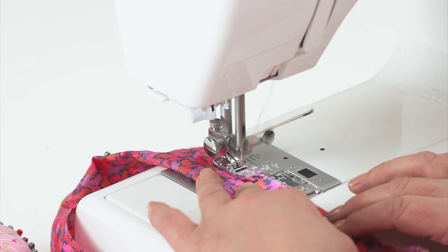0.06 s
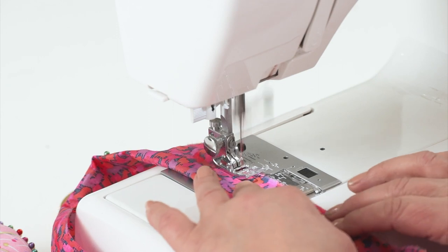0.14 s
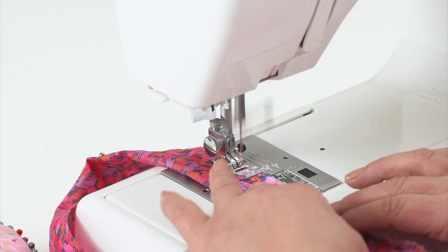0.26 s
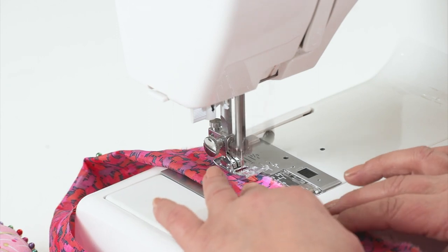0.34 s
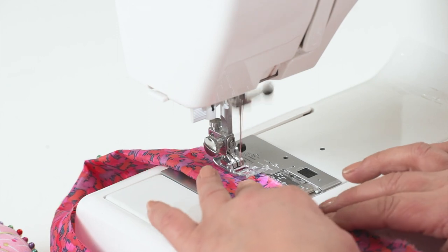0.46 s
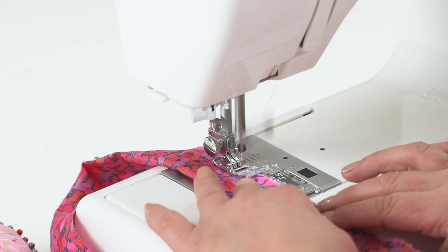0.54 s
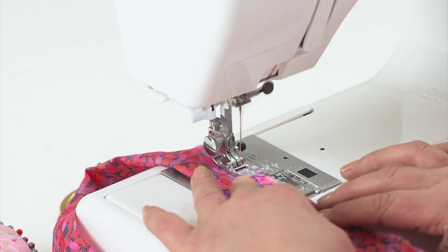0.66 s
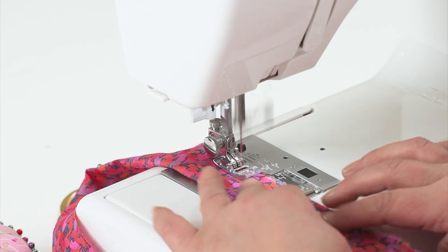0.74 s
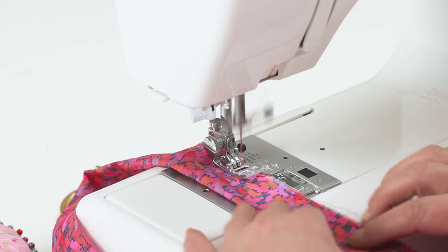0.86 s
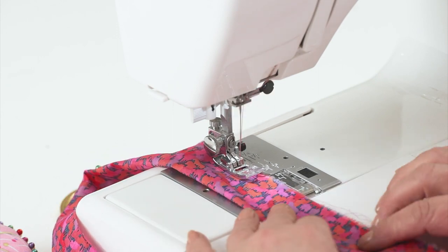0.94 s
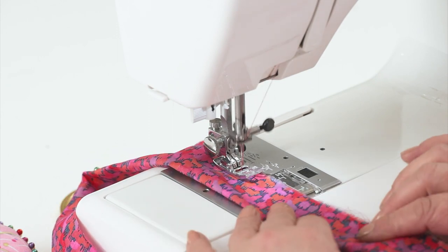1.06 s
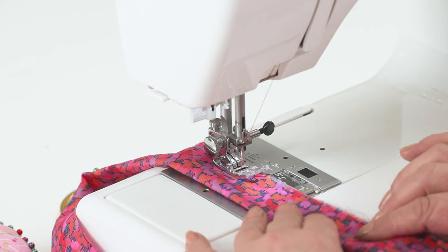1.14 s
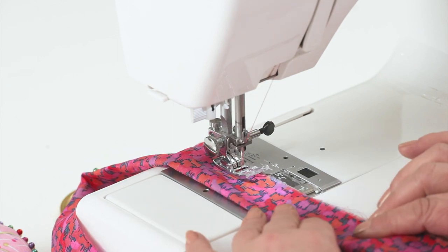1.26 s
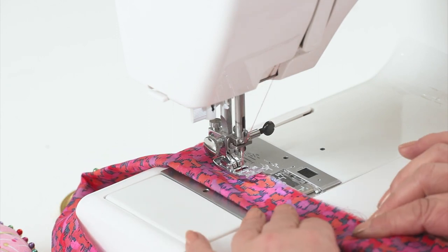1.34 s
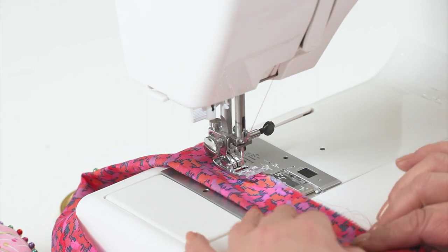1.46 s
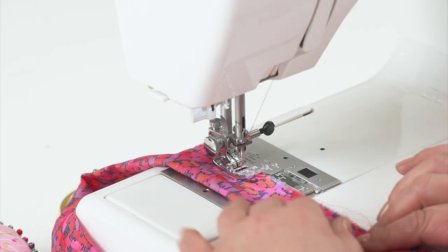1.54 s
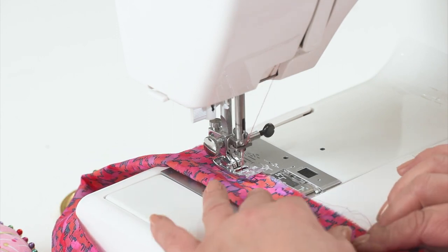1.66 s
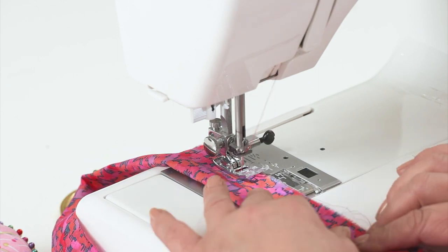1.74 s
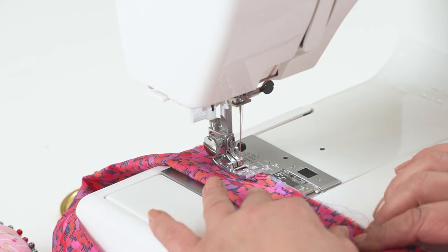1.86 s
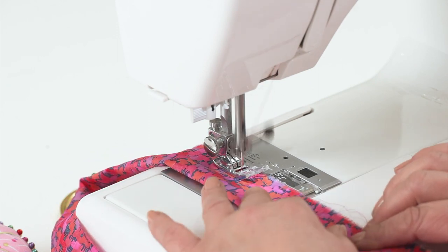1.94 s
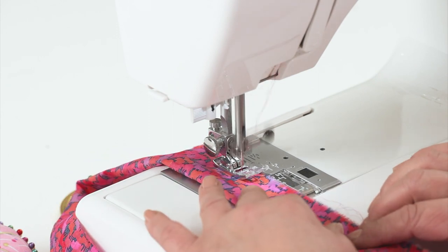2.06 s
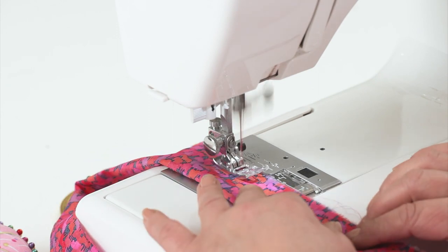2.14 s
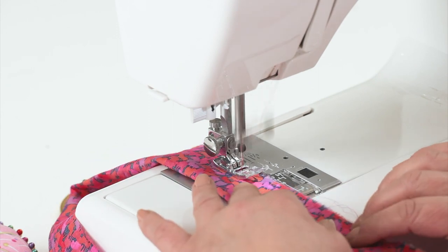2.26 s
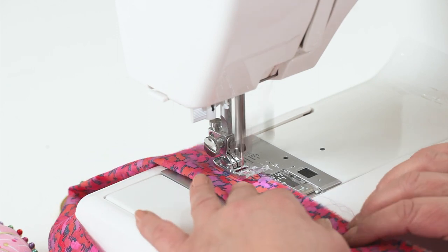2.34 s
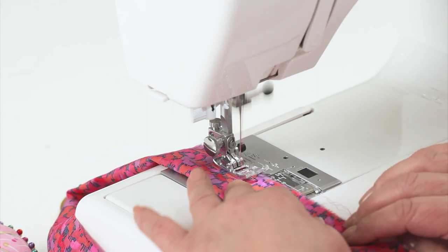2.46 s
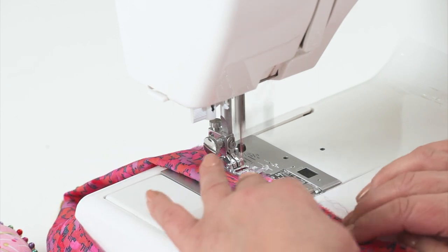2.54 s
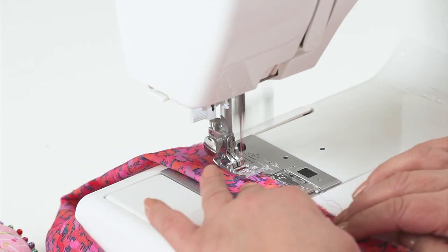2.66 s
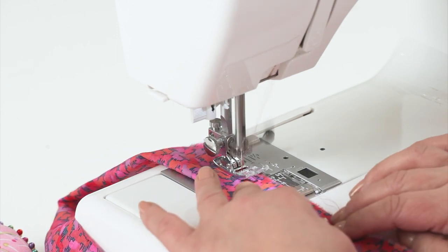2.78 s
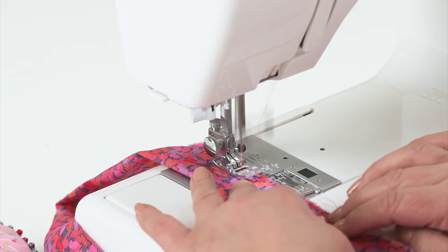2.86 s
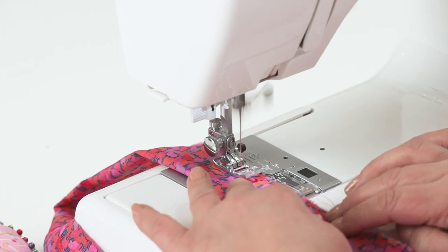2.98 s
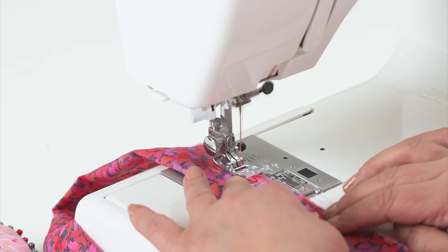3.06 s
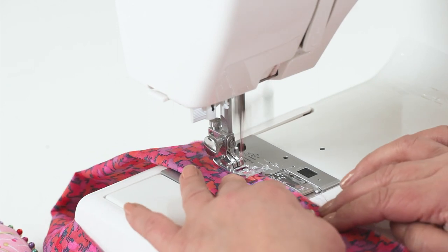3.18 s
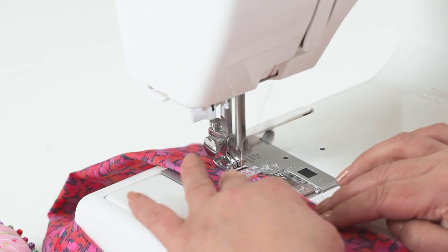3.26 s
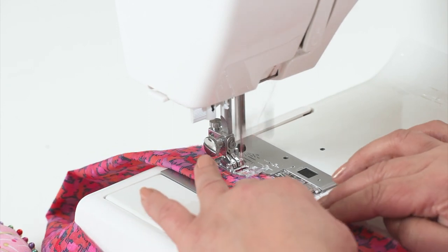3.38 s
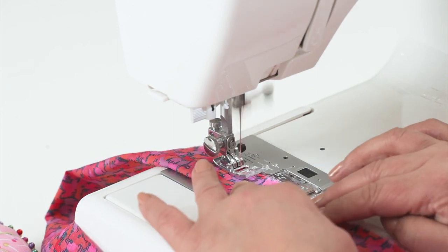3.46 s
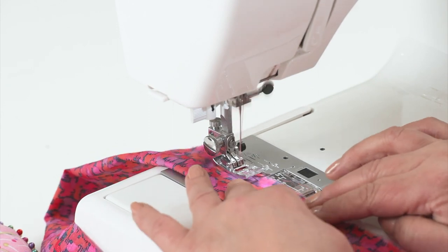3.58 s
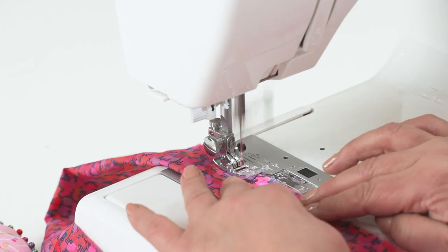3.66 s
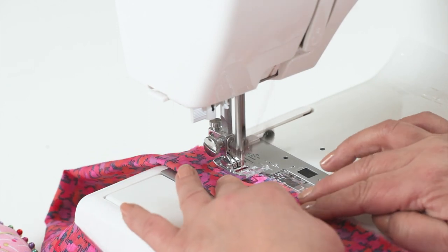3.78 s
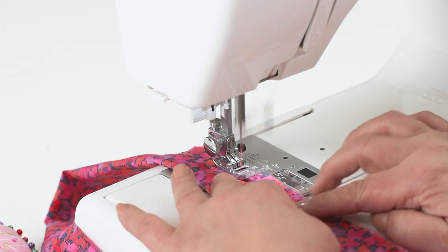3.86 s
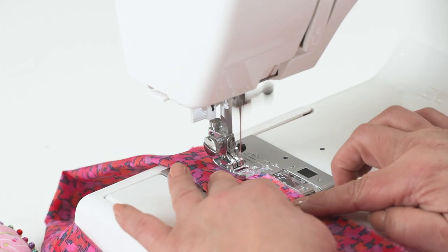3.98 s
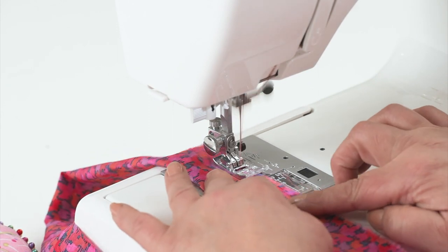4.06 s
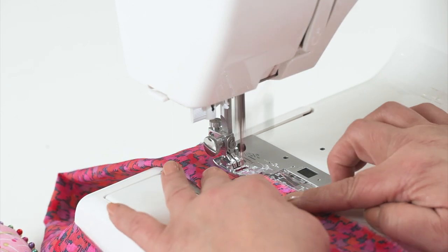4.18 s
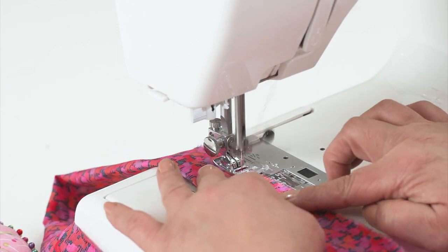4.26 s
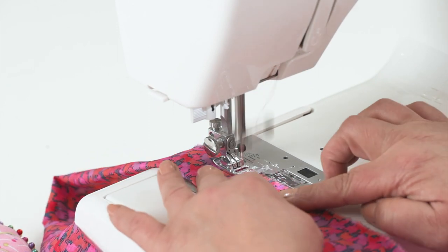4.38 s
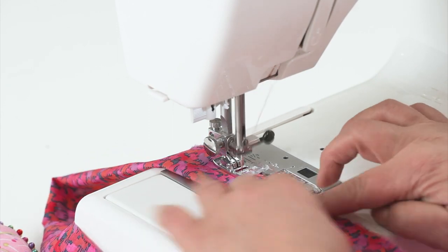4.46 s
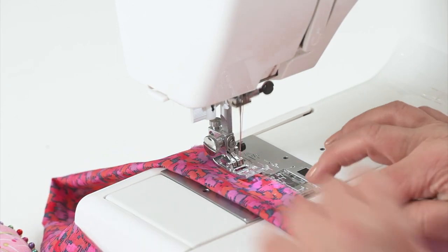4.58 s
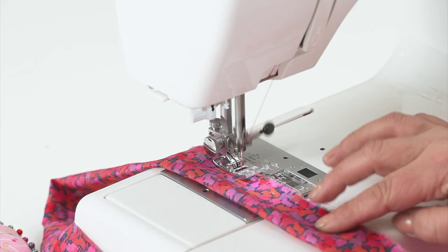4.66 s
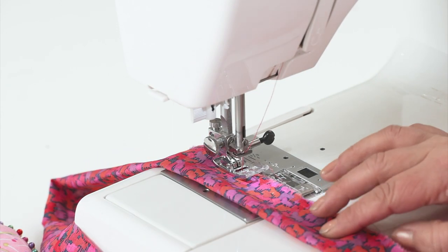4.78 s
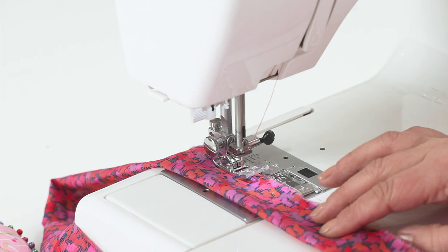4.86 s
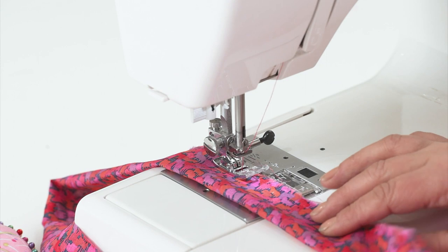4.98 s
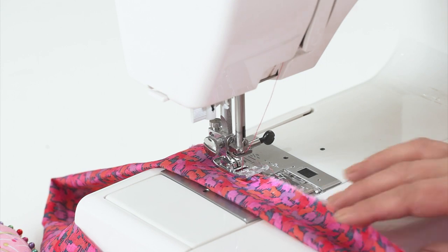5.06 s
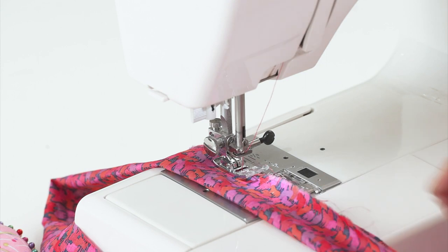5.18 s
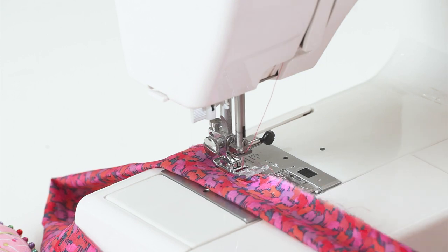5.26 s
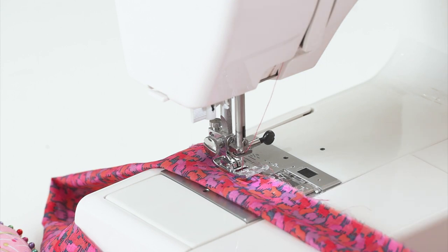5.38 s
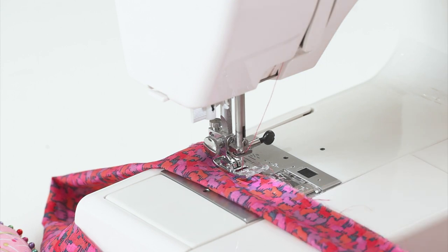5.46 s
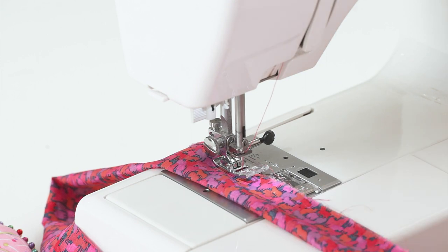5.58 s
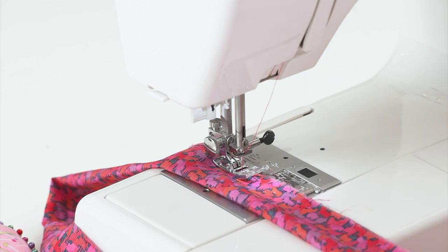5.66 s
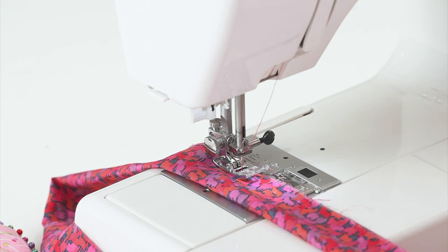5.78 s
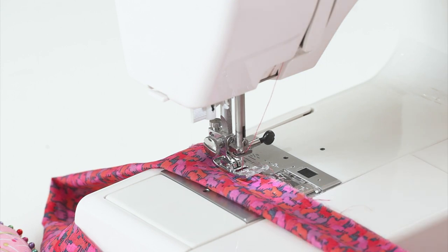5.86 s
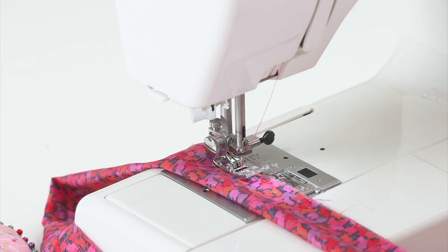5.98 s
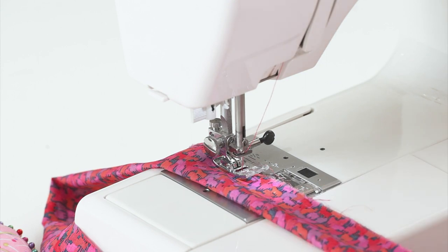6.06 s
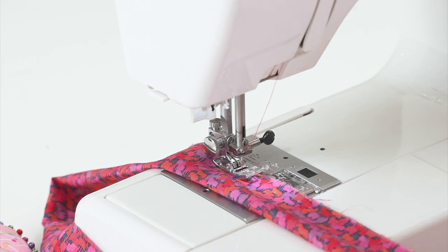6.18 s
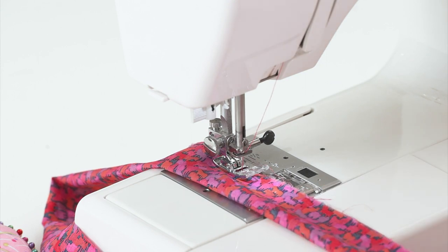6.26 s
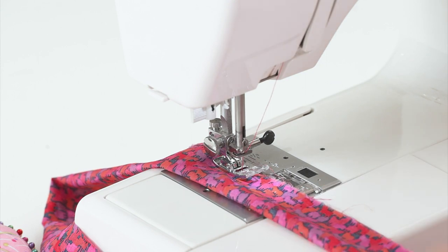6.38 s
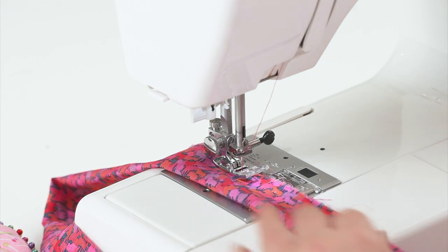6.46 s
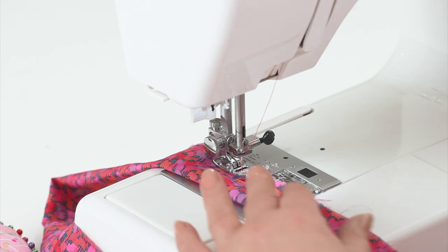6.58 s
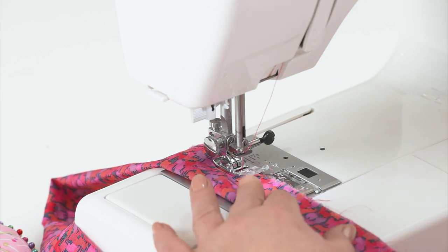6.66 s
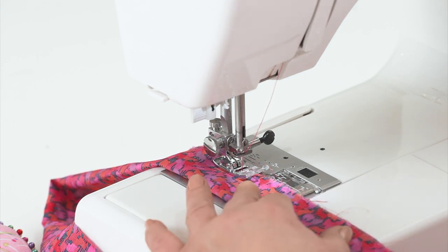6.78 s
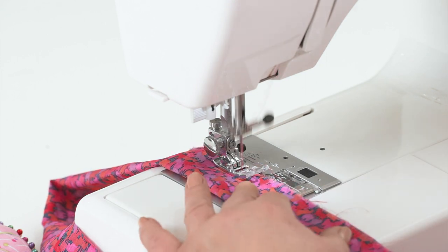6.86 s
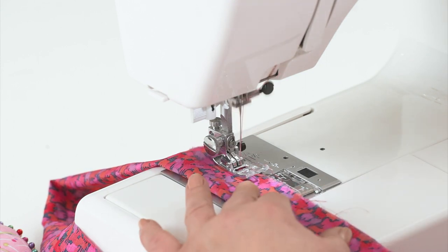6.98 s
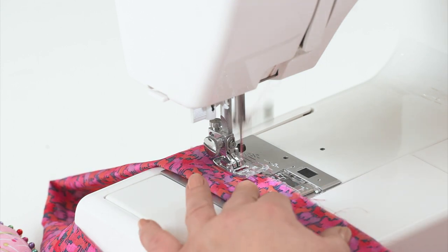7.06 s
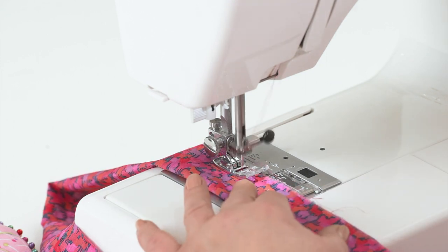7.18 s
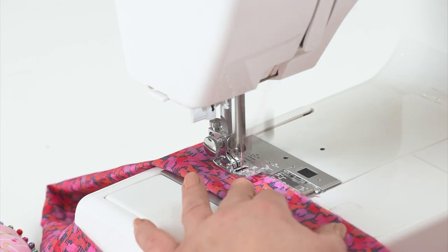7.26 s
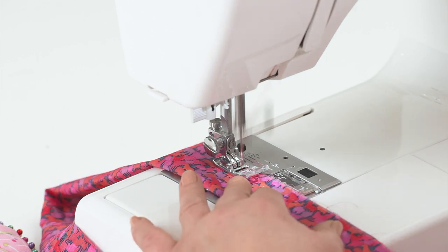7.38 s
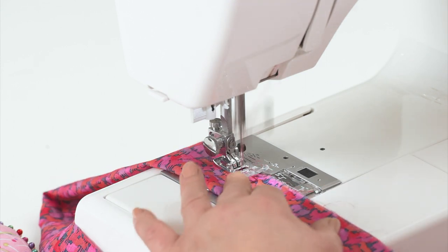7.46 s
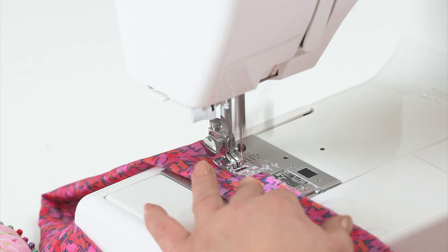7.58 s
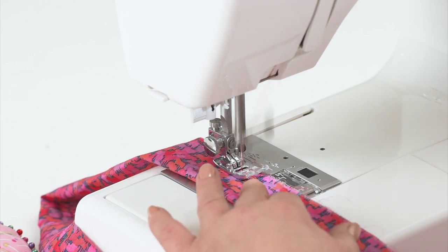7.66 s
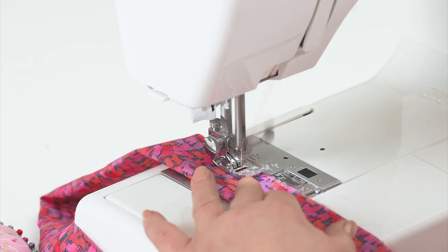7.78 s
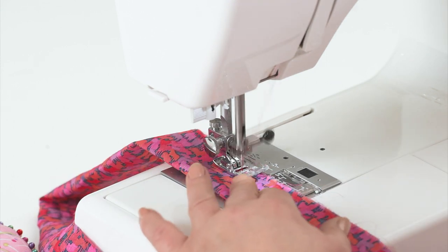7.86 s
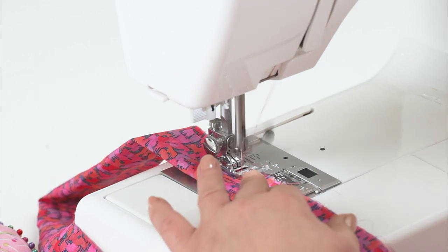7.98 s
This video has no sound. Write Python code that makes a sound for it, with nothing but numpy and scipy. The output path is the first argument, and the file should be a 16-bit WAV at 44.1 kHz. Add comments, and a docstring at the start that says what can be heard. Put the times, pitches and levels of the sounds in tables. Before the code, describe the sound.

An electric sewing machine clatters through three runs of fast stitching, slowing to stops between them, with faint cloth rustle and small taps in the pauses.

```python
"""An electric sewing machine stitches three runs of a seam on a table in a quiet room.
Once a turn a grainy hook scrape rings metal modes, and thumps and lesser blows knock the housing.
The motor adds sine hum, gear noise, commutator whine and table shake; the belt groans at some starts.
In the pauses grainy noise makes shifting cloth, and short blows ring the table top as taps."""
import sys
import numpy as np
from scipy import signal
from scipy.fft import rfft, irfft
from scipy.io import wavfile
from scipy.ndimage import uniform_filter1d

SR = 44100
rng = np.random.default_rng(int(sys.argv[2]) if len(sys.argv) > 2 else 0)


def to_linear_factor(level_db):
    """Convert decibel levels (scalar or array-like) to linear amplitude factors."""
    exponent = np.asarray(level_db, float) / 20
    return 10 ** exponent


def materialize(psi):
    """Save the field psi as 16-bit PCM at rate SR to the path in sys.argv[1].

    A 1-D psi becomes a single channel; in a 2-D psi each row is a channel.
    """
    bounded = np.clip(np.atleast_2d(psi).T, -1, 1)
    quanta = np.round(bounded * 32767).astype(np.int16)
    wavfile.write(sys.argv[1], SR, quanta)


N = 354123
TIME = np.arange(N) / SR   # s
FULL_SPEED = 12   # stitches per s
HUM_HZ = 99.7


def rms_one(x):
    """Scale to rms 1."""
    return x / np.sqrt(np.mean(x ** 2) + 1e-20)


def in_time(tables):
    """Columns of dB over time, at -120 dB outside the tables."""
    out = -120.
    for rows in tables:
        s, *columns = np.transpose(rows)
        levels = [np.interp(TIME, s, column, left=-120, right=-120) for column in columns]
        out = np.maximum(out, levels)
    return out


def drift(rate):
    """Slow random wander of rms 1, with this many new values per second."""
    steps = rng.standard_normal(int(N / SR * rate) + 2)
    return rms_one(np.interp(TIME * rate, np.arange(len(steps)), steps))


def cut(x, hz, kind):
    """Butterworth filter of order 2 in its design."""
    sos = signal.butter(2, np.clip(hz, 10, .45 * SR), kind, fs=SR, output="sos")
    return signal.sosfilt(sos, x + 1e-18)


def coloured(spectrum):
    """Noise of rms 1 with the given spectrum."""
    hz, db = np.transpose(spectrum)
    bins_hz = np.maximum(np.arange(N // 2 + 1) * SR / N, 1)
    gain = to_linear_factor(np.interp(np.log(bins_hz), np.log(hz), db))
    return rms_one(irfft(rfft(rng.standard_normal(N)) * gain, N))


def resonate(x, modes, widen=0.73):
    """Parallel resonances with alternating signs; widen scales every width, so wider rings shorter."""
    out = 0
    for k, (hz, width, db) in enumerate(modes):
        r = np.exp(-np.pi * width * widen / SR)
        poles = [1, -2 * r * np.cos(2 * np.pi * hz / SR), r * r]
        zeros = [(1 - r * r) / 2, 0, (r * r - 1) / 2]
        out = out + (-1) ** k * to_linear_factor(db) * signal.lfilter(zeros, poles, x + 1e-18)
    return out


def clicks(seconds, sizes):
    """A train of single-sample clicks."""
    at, out = np.round(seconds * SR).astype(int), np.zeros(N)
    inside = (at >= 0) & (at < N)
    np.add.at(out, at[inside], sizes[inside])
    return out


def burst(train, hold_s, fade_s, grain_db):
    """Each click opens a short grainy scrape that holds, then fades."""
    t = np.arange(int(.05 * SR)) / SR
    shape = np.exp(-np.maximum(t - hold_s, 0) / fade_s)
    grains = rng.standard_normal(N) * to_linear_factor(grain_db * np.minimum(rng.exponential(1, N), 2))
    return signal.fftconvolve(train, shape)[:N] * rms_one(grains)


def at_speed(speed, base_db, doubling_db):
    """Level in dB: base_db at full speed, plus doubling_db for each doubling of speed."""
    return base_db + doubling_db * np.log2(np.maximum(speed, 1e-3) / FULL_SPEED)


# Shaft speed, one table per run. Each row: time in seconds, speed in stitches per second.
SHAFT_SPEED = [
    [(0, 10.85), (.67, 10.993), (.85, 7.33), (1, 4.89), (1.22, 0)],
    [(1.66, 0), (1.9, 5.348), (2.08, 9.085), (2.25, 10.822), (2.55, 11.778), (3, 11.985), (4.31, 12.106),
     (4.4, 10.091), (4.56, 6.563), (4.98, 0)],
    [(6.75, 0), (6.99, 4.927), (7.2, 8.292), (7.4, 9.668), (7.7, 10.475), (8.03, 10.726)],
]
# How far the shaft turns from the start of each run to its first hook click. One value per run, in turns.
FIRST_CLICK_TURNS = [.6492, .6645, .5997]


def shaft():
    """Speed and angle (turns) over time; start and length of every turn, with one led in before each run."""
    speed, angle, turns = np.zeros(N), np.zeros(N), []
    for rows, first in zip(SHAFT_SPEED, FIRST_CLICK_TURNS):
        s, rate = np.transpose(rows)
        run = np.interp(TIME, s, rate, left=0, right=0)
        done = np.cumsum(run) / SR - first
        speed = speed + run
        angle = np.where(TIME >= s[0], done + np.ceil(angle[-1]) + 1, angle)
        click = np.interp(np.arange(int(done[-1]) + 1), done[run > 0], TIME[run > 0])
        gaps = np.diff(click)
        # the outer turns carry on the change in length of their neighbours
        lead, last = gaps[0] ** 2 / gaps[1], gaps[-1] ** 2 / gaps[-2]
        turns.append([np.r_[click[0] - lead, click], np.r_[lead, gaps, last]])
    return speed, angle, *np.concatenate(turns, axis=1)


def click_levels(start, speed):
    """Click and clack dB of every turn: both sink with speed, and chance makes some clacks land badly."""
    now, luck = np.interp(start, TIME, speed, left=0), rng.random((len(start), 2))
    # below 5.3 stitches per s, a further 23 dB is lost per halving
    fade_db = 23 * np.minimum(np.log2(np.maximum(now, 1e-3) / 5.3), 0)
    spread_db = np.sqrt(12) * (luck[:, 0] - .5)   # uniform, standard deviation 1 dB
    miss_db = 6 * np.log(1 - luck[:, 1])   # mean loss 6 dB
    click_db = at_speed(now, base_db=-25, doubling_db=1.7) + fade_db + spread_db
    clack_db = at_speed(now, base_db=-25, doubling_db=10) + fade_db + miss_db
    return click_db, clack_db


# Metal modes of the hook. Each row: pitch in Hz, width in Hz before widening, relative level in dB.
HOOK_MODES = [(5080, 32, 1.5), (6020, 250, -3), (6816, 81, 6), (7004, 68, 10.5), (7176, 127, 7.5),
              (8180, 170, 7.5), (8390, 303, 2.5), (12900, 530, -13.5), (13100, 59, -19)]
# Duller modes of the clack. Each row: pitch in Hz, width in Hz before widening, relative level in dB.
CLACK_MODES = [(1262, 47, 7.5), (1815, 44, 6), (2550, 41, -8.5)]
# Lighter metal ticks after the click. Each row: delay as a share of a turn, drive against the click
# in dB, pitch in Hz, width in Hz before scaling.
TICKS = [(0.46, -15.5, 11300, 6500), (0.15, -28, 13000, 6500), (.565, 8, 2830, 300), (0.5, 18, 2330, 69),
         (0.52, 11, 1600, 1900)]


def hook(start, length, click_db, clack_db):
    """The hook scrapes past the bobbin case, a duller clack follows, then lighter ticks."""
    scrape = burst(clicks(start, to_linear_factor(click_db)), 0.0023, 0.0037, 5)
    clack = burst(clicks(start + .05 * length, to_linear_factor(clack_db)), 0.0018, 0.004, 9.6)
    out = to_linear_factor(1) * resonate(scrape, HOOK_MODES, widen=4.8)
    out += to_linear_factor(12.5) * resonate(clack, CLACK_MODES, widen=1.28)
    for share, db, hz, width in TICKS:
        luck = rng.uniform(-2.0, 1, (len(start), 2))
        # slow turns tick softly
        force = to_linear_factor(click_db + db + 1.2 * luck[:, 1]) * (length.min() / length) ** 2
        train = clicks(start + (share + 0.01 * luck[:, 0]) * length, force)
        tick = burst(train, 0.0023, 0.0014, 1.6)
        for _ in range(2):   # the same resonance twice, for steeper skirts
            tick = resonate(tick, [(hz, width, 0)])
        out += tick
    return out


# Lesser blows of feed and take-up lever. Each row: delay as a share of a turn, relative force in dB,
# direction as a sign, hardness as a lowpass in Hz.
BLOWS = [(0.03, 2.5, -1, 500), (.155, 2, -1, 500), (0.247, 3, -1, 600), (0.299, 7, 1, 500),
         (.435, 2.5, -1, 600), (.52, 3.5, 1, 500), (0.578, -2.5, 1, 500), (0.658, -4.5, 1, 500),
         (0.779, -7, 1, 500), (0.872, 1, 1, 500)]
# Modes of the housing. Each row: pitch in Hz, width in Hz before scaling, relative level in dB.
HOUSING_MODES = [(130, 23, -5), (215.8, 17.1, -5), (281.5, 13, -4.5), (308.6, 32, -6), (374.4, 34.6, 0),
                 (423, 79, -7.5), (547, 28.6, -5), (608.3, 23.4, -3), (684, 265, -9.5), (918, 200, -12.5),
                 (1290, 70, -29.5), (1846, 85, -13), (2380, 5.8, -40), (2670, 360, -23), (4000, 250, -24),
                 (4370, 33, -18.5), (5340, 46, -54)]
# Modes of the main thump. Each row: pitch in Hz, width in Hz before scaling, relative level in dB.
THUMP_MODES = [(130, 110, 2), (240, 170, 0), (380, 200, -3), (600, 250, -9)]


def linkage(start, length, level_db):
    """Needle-bar thump and lesser blows ring the housing; slack parts chatter on motor torque pulses."""
    blows = 0
    for share, db, direction, hardness_hz in BLOWS:
        luck = rng.standard_normal((len(start), 2))
        force = np.sign(direction) * to_linear_factor(db + 2 * luck[:, 1])
        train = clicks(start + (share + 0.0045 * luck[:, 0]) * length, force)
        blows = blows + cut(train, hardness_hz, "low") * SR / hardness_hz
    torque = 1 + np.cos(2 * np.pi * HUM_HZ * TIME)
    slack = (rng.random(N) < 600 * torque / SR) * rng.standard_normal(N)
    knocks = rms_one(blows) + to_linear_factor(-6) * rms_one(cut(slack, 495, "low"))
    # the needle bar turns round: firmest for turns of 0.095 to 0.11 s
    firm = np.minimum(.11 / length, 1) ** 2 * np.minimum(length / .095, 1) ** 2
    firm = firm * to_linear_factor(rng.normal(0, 1, len(start)))
    push = cut(clicks(start + .364 * length, -firm), 700, "low")
    thump = to_linear_factor(52) * resonate(push, THUMP_MODES)
    return to_linear_factor(level_db - 3.5) * (rms_one(resonate(knocks, HOUSING_MODES, widen=1.0)) + thump)


# Hum partials. Each row: multiple of the hum pitch, relative level in dB.
HUM_PARTIALS = [(1, 1), (2, -12.5), (3, -21.5), (4, -18), (6, -43)]
# Course of the hum, strong at starts and in places while slowing, mostly weaker at full speed.
# One table per run, each row: time in seconds, relative level in dB.
HUM_LEVEL = [
    [(0, -31), (.7, -53), (.93, -29), (1.14, -47), (1.23, -50.5), (1.35, -63)],
    [(1.6, -71), (1.67, -36.5), (1.78, -27.5), (1.85, -30.5), (2.03, -31.5), (2.3, -29.5), (2.7, -43),
     (4.3, -36), (4.52, -33), (4.79, -44), (4.95, -82)],
    [(6.68, -63), (6.75, -44), (6.89, -38), (6.96, -32), (7.11, -24.5), (7.23, -38.5), (8.03, -31)],
]


def motor_hum(angle, speed_share):
    """Mains hum as a stack of sines, wavering by chance and swelling once a turn."""
    hum = sum(to_linear_factor(db) * np.sin(2 * np.pi * k * HUM_HZ * TIME + k) for k, db in HUM_PARTIALS)
    swell_db = 0.76 * np.cos(2 * np.pi * (angle - .4)) * speed_share
    return to_linear_factor(in_time(HUM_LEVEL)[0] + 4 + swell_db + 1.5 * drift(18)) * hum


# Spectrum of the gear whir before its highpass. Each row: frequency in Hz, relative density in dB per Hz.
WHIR_SPECTRUM = [(35, -36), (60, 1.5), (118, 1.5), (300, 1), (362, -7), (468, -31.5), (551, -3),
                 (1060, -13), (1900, -20), (4830, -28), (7180, -32), (15900, -55)]


def gear_whir(angle, gear_db):
    """Meshing gears: noise plus random tooth hits ringing the housing, pulsing with the load each turn."""
    load_db = 0.66 * np.cos(2 * np.pi * (angle - .25))
    teeth = (rng.random(N) < 2500 / SR) * rng.standard_normal(N)
    rattle = rms_one(cut(resonate(teeth, HOUSING_MODES), 1090, "high"))
    hiss = cut(coloured(WHIR_SPECTRUM), 910, "high")
    return to_linear_factor(gear_db + load_db + 1.2 * drift(30)) * (to_linear_factor(12.5) * hiss + to_linear_factor(-1) * rattle)


# Commutator tones. Each row: cycles per turn, level in dB against the gears before the shell rings.
WHINE_TONES = [(331.0, -21), (442.0, -23)]
# Modes of the motor shell. Each row: pitch in Hz, width in Hz before scaling, gain in dB per pass.
SHELL_MODES = [(2980, 420, 8), (4000, 900, -3), (5050, 500, 5.5)]


def commutator_whine(speed, gear_db):
    """Tones locked to the smoothed shaft angle, passed twice through each mode of the motor shell."""
    smooth = uniform_filter1d(np.cumsum(speed) / SR, size=SR // 8)
    whine = 0
    for k, db in WHINE_TONES:
        level = to_linear_factor(gear_db + db + 2 * drift(8))
        whine = whine + level * np.sin(2 * np.pi * k * smooth + .5 * drift(60))
    return sum(resonate(resonate(whine, [mode]), [mode]) for mode in SHELL_MODES)


# Table shaken by the shaft. Each row: multiple of the stitch rate, relative level in dB.
SHAKE_PARTIALS = [(2, -60), (3, -77), (4, -50.5), (5, -58), (6, -46), (7, -50)]


def table_shake(angle, speed_share, linkage_db):
    """The turning shaft shakes the table at low multiples of the stitch rate, more at speed."""
    shake = sum(to_linear_factor(db) * np.cos(2 * np.pi * k * (angle - .2)) for k, db in SHAKE_PARTIALS)
    return to_linear_factor(linkage_db + 30.5) * speed_share * shake


# Lowest modes of the table. Each row: pitch in Hz, width in Hz before scaling, gain in dB.
JOLT_MODES = [(101, 7, 36), (139, 14, 33), (216, 10, 32)]


def jolt(start, length):
    """Once a turn the needle bar's weight jolts the table's lowest modes, harder at speed."""
    force = to_linear_factor(rng.normal(0, 1.95, len(start))) * (FULL_SPEED * length) ** -2.1
    push = cut(clicks(start + .2 * length, force), 280, "low")
    return sum(resonate(push, [mode]) for mode in JOLT_MODES)


# The loaded belt at the second and third start. Each row: time of the peak in seconds, level in dB.
GROANS = [(1.83, -30.5), (6.959, -30.5)]
# Housing modes rung by the belt. Each row: pitch in Hz, width in Hz before scaling, relative level in dB.
GROAN_MODES = [(357.4, 22.5, 7), (600, 65, -9)]


def groan():
    """Before the shaft is up to speed the belt judders on its pulley and rings loud housing modes."""
    rise, fall = 192, 89   # dB per s
    slips = (rng.random(N) < 300 / SR) * rng.standard_normal(N)
    level = sum(to_linear_factor(db - np.maximum(rise * (s - TIME), fall * (TIME - s))) for s, db in GROANS)
    return level * rms_one(resonate(cut(slips, 1350, "low"), GROAN_MODES))


# Taps, clunks, pedal clicks, and at 4.824 s the bright edge of the last slow hook click.
# Each row: time in seconds, relative blow level in dB, body pitch in Hz, relative treble level in dB,
# treble pitch in Hz.
TAPS = [(1.107, -26, 740, -62, 4410), (1.169, -62, 900, -68, 4500), (1.361, -47, 352, -86, 8950),
        (1.633, -43.5, 390, -61, 4670), (1.66, -40.5, 814, -72, 4170), (4.824, -70, 600, -64, 11500),
        (4.954, -52.5, 853, -78, 4160), (4.976, -67, 571, -70, 7480), (5.037, -21, 680, -61, 4660),
        (5.234, -60, 686, -66, 4750), (5.397, -48, 905, -63, 3710), (5.402, -45, 1300, -64, 5990),
        (5.635, -59, 446, -70, 3950), (6.724, -47, 380, -60.5, 4830), (6.747, -42, 453, -85, 4000),
        (6.87, -35, 346, -64, 4240)]
# Modes of the table top. Each row: pitch in Hz, relative level in dB, 60 dB decay in seconds before damping.
TABLE_TOP = [(152, -8, 0.29), (200, 3, 0.67), (336, -0.5, 0.86), (555, -3.5, 0.16), (617, -8, 0.32),
             (640, -13, 0.52), (710, -5, 0.17), (837, -8, 0.26), (1000, -17.5, 0.073), (1300, -8, 0.3),
             (1530, -22, 0.19), (1500, -38, 0.86)]


def taps():
    """A blow and a short rattle ring the table top up to the tap's body pitch, with a bright tick on top."""
    # a decay time becomes a resonance width
    modes = [(hz, np.log(1000) / (np.pi * t60), db) for hz, db, t60 in TABLE_TOP]
    out = 0
    for s, blow_db, body_hz, treble_db, treble_hz in TAPS:
        blow = clicks(np.array([s]), np.ones(1))
        rattle = burst(blow, 0.015, 0.0098, 9.4)
        force = to_linear_factor(blow_db + 15) * cut(22 * blow + rattle, 1.47 * body_hz, "low")
        force = cut(force, 0.47 * body_hz, "high")
        treble_mode = (treble_hz, 0.93 * treble_hz, treble_db + 16)
        tick = resonate(burst(blow, 0.0011, 0.004, 2.1), [treble_mode])
        body = resonate(force, modes, widen=16)   # heavily damped
        out = out + body + to_linear_factor(-23) * cut(force, 200, "high") + tick
    return out


# Cloth under the hand in the pauses, one table per pause. Each row: time in seconds, hiss level in dB,
# drag level in dB.
CLOTH = [
    [(1.2, -85, -71), (1.41, -94, -72), (1.62, -89, -63.5)],
    [(4.85, -70, -76), (4.95, -90, -75), (5.15, -76, -58), (5.37, -72, -74), (5.41, -70, -56.5),
     (5.79, -67.5, -67.5), (6.02, -96, -73), (6.29, -62, -70.5), (6.38, -83, -72), (6.72, -66, -69.5)],
]


def cloth():
    """Fabric slides under the hand: fine grainy hiss and a duller drag on the bed."""
    hiss_db, drag_db = in_time(CLOTH)
    grain_db = 4.9 * np.minimum(rng.exponential(1, (2, N)), 2)
    grains = rng.standard_normal((2, N)) * to_linear_factor(grain_db)
    hiss = rms_one(cut(grains[0], [3000, 13000], "band"))
    drag = rms_one(resonate(grains[1], [(500, 400, 23.0), (1300, 1150, 9.6)]))
    return to_linear_factor(hiss_db) * hiss + to_linear_factor(drag_db) * drag


def room(x):
    """A dull tail of dense echoes: lowpassed noise under an exponential decay."""
    t60_s, level_db, cut_hz = 0.47, -9.5, 8700
    t = np.arange(int(.6 * SR)) / SR
    tail = cut(rng.standard_normal(len(t)), cut_hz, "low") * to_linear_factor(-60 * t / t60_s) * (t > .006)
    return to_linear_factor(level_db) * signal.fftconvolve(x, tail / np.sqrt(np.sum(tail ** 2)))[:N]


# Spectrum of the quiet air. Each row: frequency in Hz, relative density in dB.
AIR_SPECTRUM = [(12, -25), (20, 2.5), (113, -0.5), (167, -10.5), (365, -20.5), (657, -40), (999, -25),
                (2310, -34.5), (4390, -34.5), (14200, -36), (15900, -37)]


def air():
    """Steady noise of the quiet room, mostly low."""
    return to_linear_factor(-54) * coloured(AIR_SPECTRUM)


def scene():
    """Hook, linkage, belt and taps with room echo; motor, table, cloth and air without it."""
    speed, angle, start, length = shaft()
    share = speed / FULL_SPEED
    settled = uniform_filter1d(speed, size=int(0.11 * SR), mode="nearest")   # levels follow over 0.11 s
    # gears and linkage are louder under power than coasting: dB per (stitch/s gained each second)
    pull_db = 0.055 * np.gradient(settled) * SR
    race_db = 1.5 * share ** 10   # the linkage gains this close to full speed
    linkage_db = at_speed(settled, base_db=-26, doubling_db=7.4) + race_db + 0.067 * pull_db
    gear_db = at_speed(settled, base_db=-36.5, doubling_db=9.6) + pull_db

    echoed = hook(start, length, *click_levels(start, speed))
    echoed = echoed + linkage(start, length, linkage_db) + groan() + taps()
    motor = motor_hum(angle, share) + gear_whir(angle, gear_db) + commutator_whine(speed, gear_db)
    table = table_shake(angle, share, linkage_db) + jolt(start, length)
    return (echoed + room(echoed) + motor + table + cloth() + air())[None]


def roll_off(x):
    """The treble ends steeply here."""
    return signal.sosfilt(signal.butter(12, 16020, fs=SR, output="sos"), x)


def record(dry):
    """Hands on the finished mix at its own level."""
    return roll_off(dry)


dry = scene()
out = record(dry)
materialize(out)
```